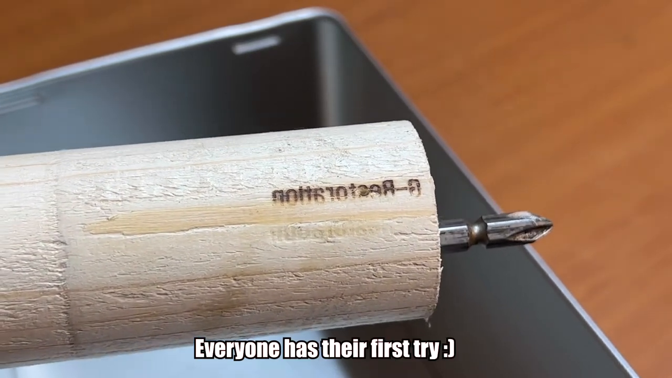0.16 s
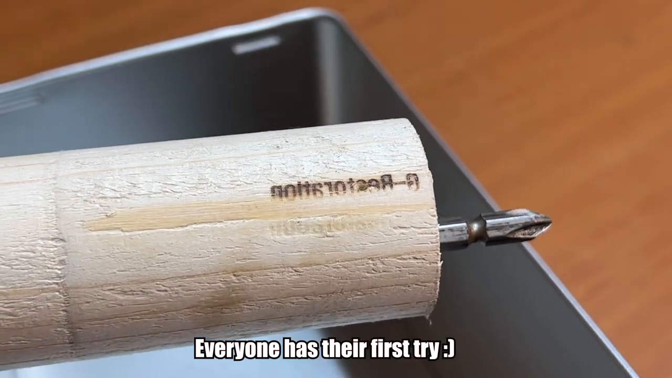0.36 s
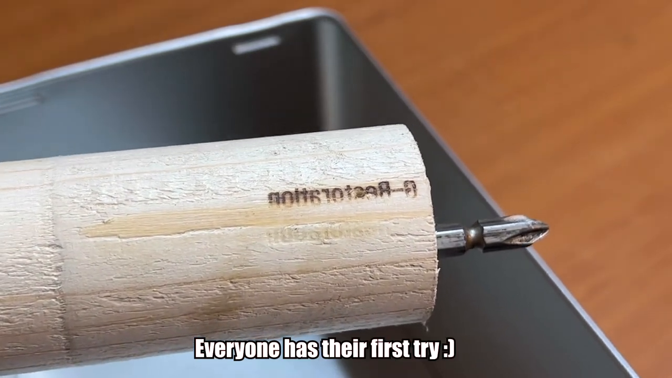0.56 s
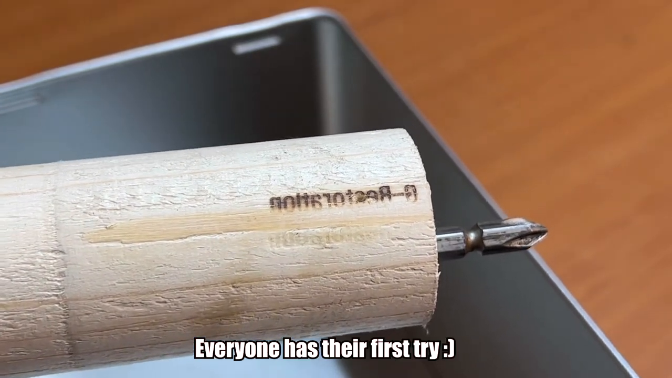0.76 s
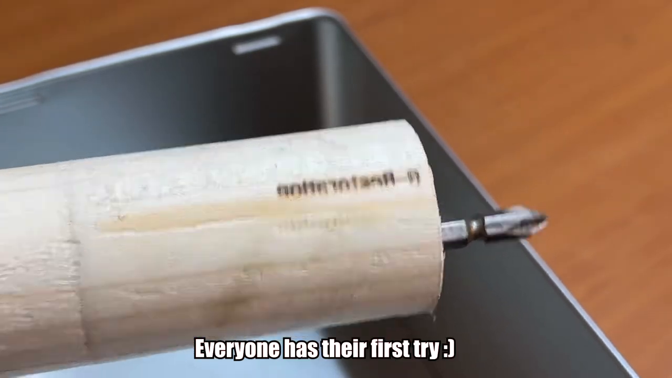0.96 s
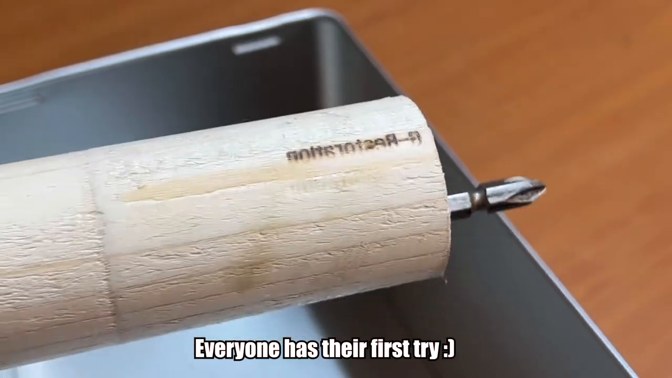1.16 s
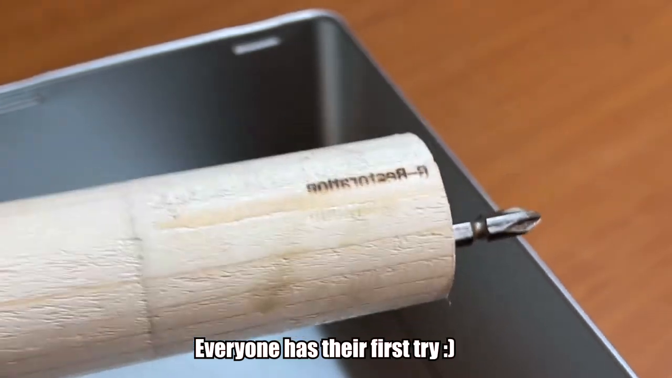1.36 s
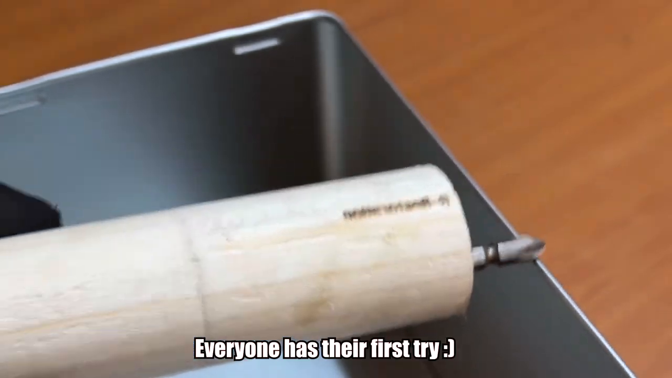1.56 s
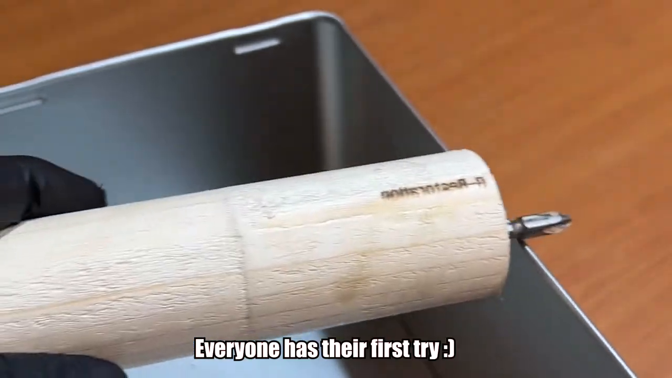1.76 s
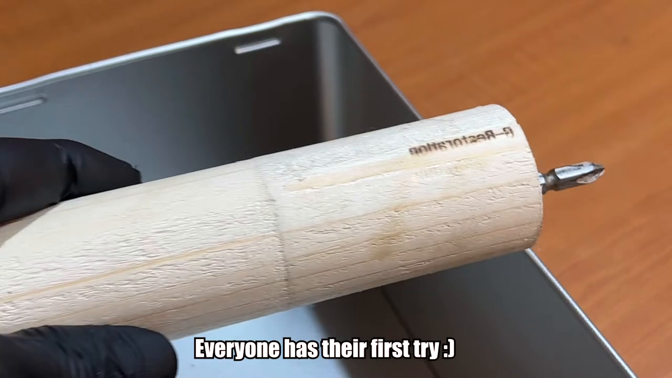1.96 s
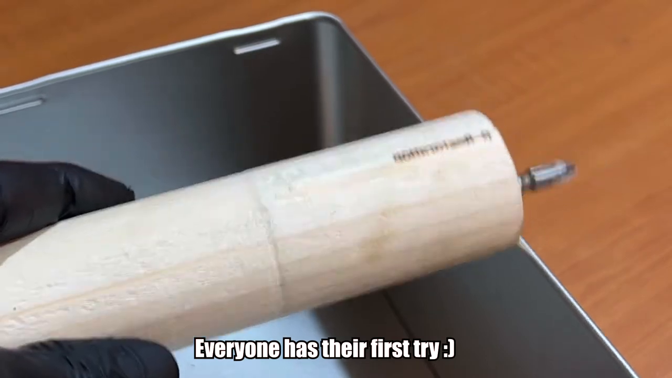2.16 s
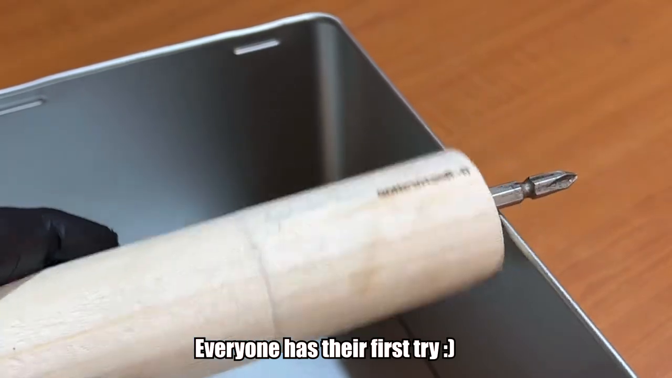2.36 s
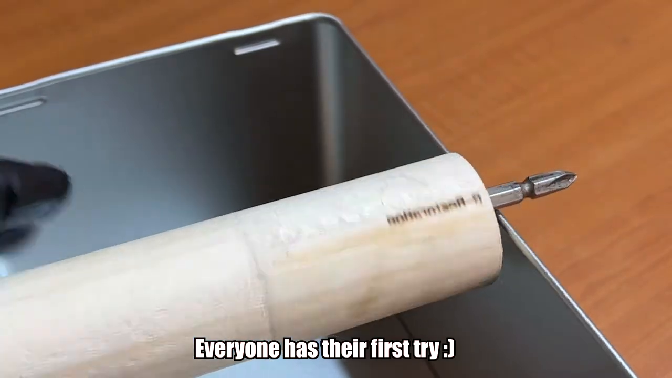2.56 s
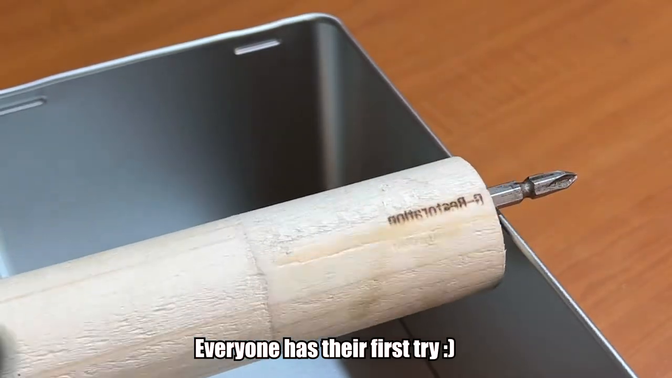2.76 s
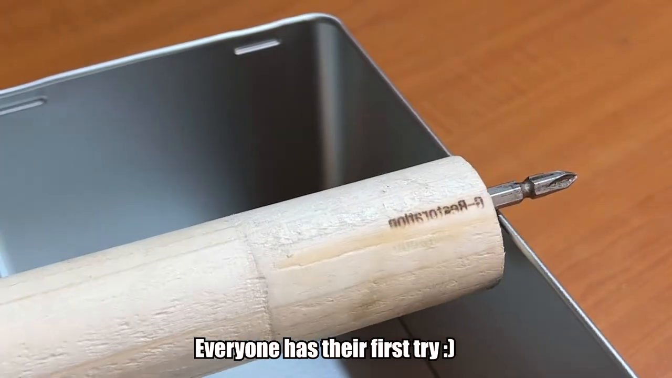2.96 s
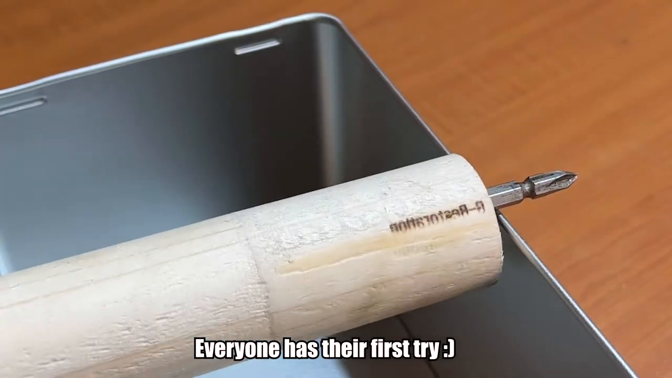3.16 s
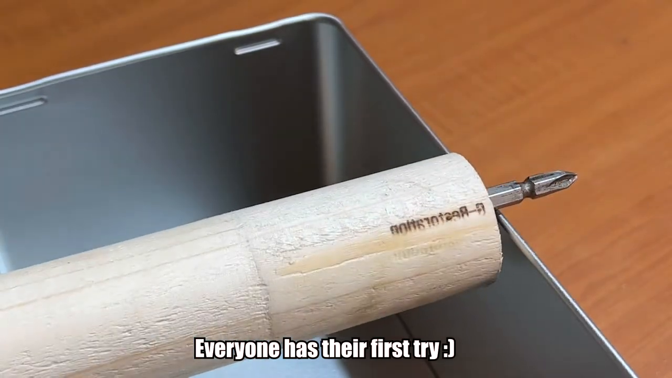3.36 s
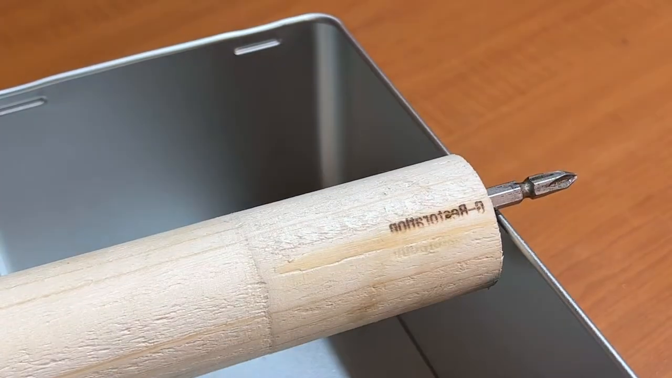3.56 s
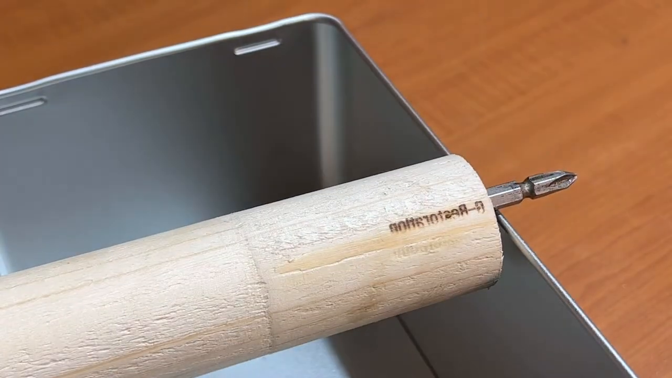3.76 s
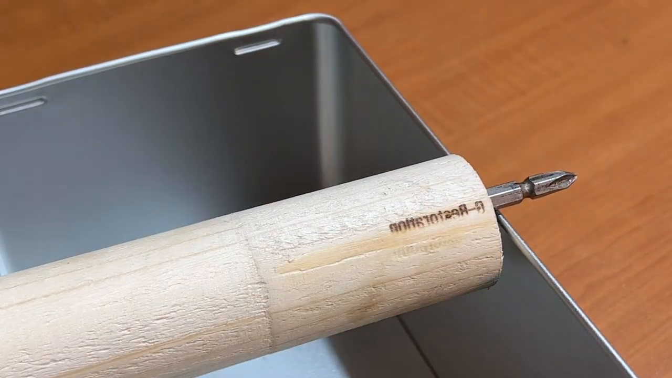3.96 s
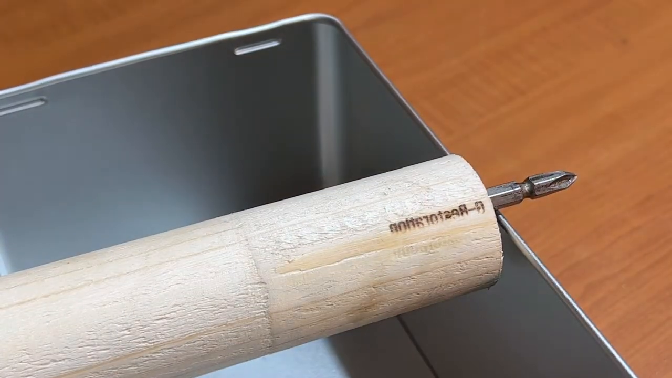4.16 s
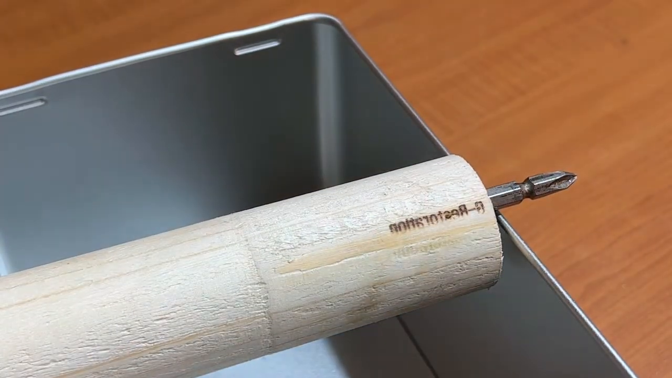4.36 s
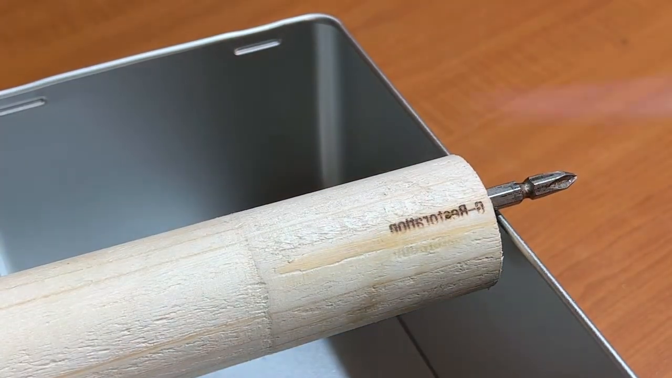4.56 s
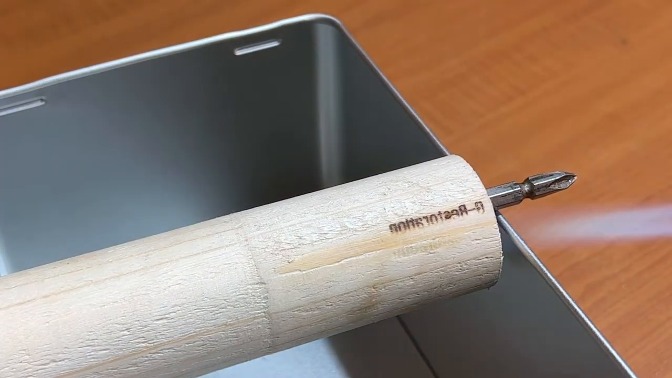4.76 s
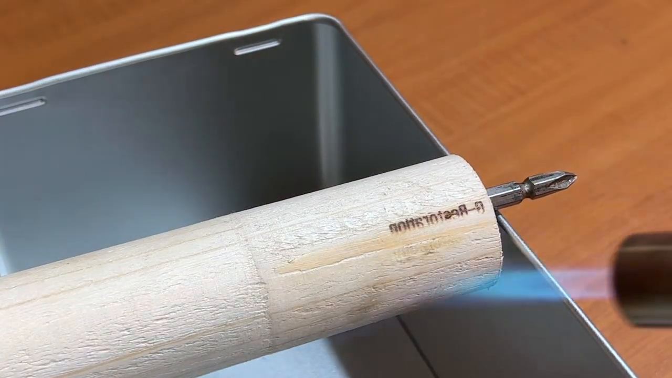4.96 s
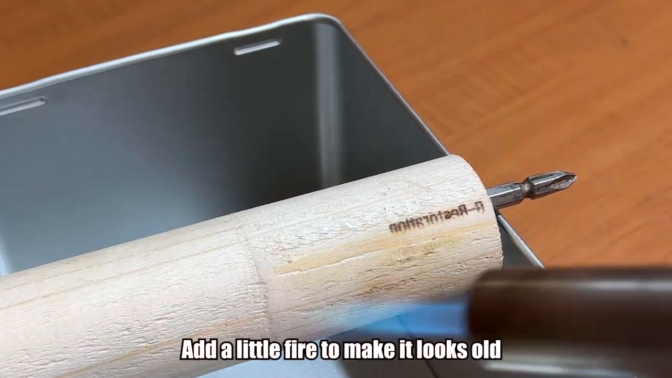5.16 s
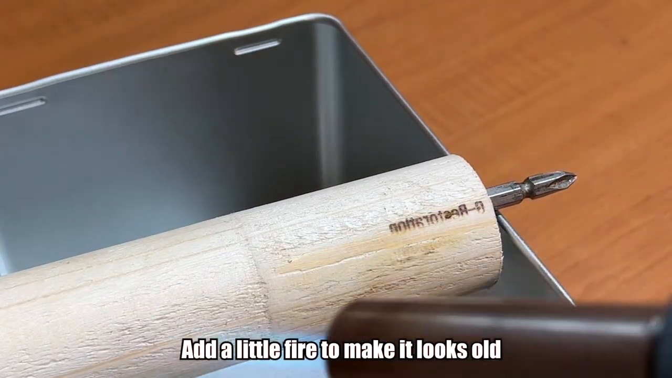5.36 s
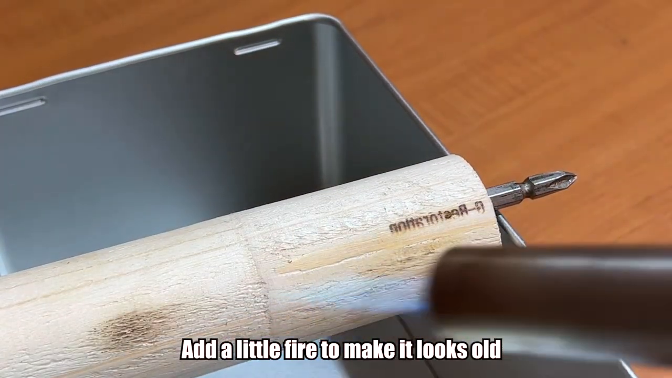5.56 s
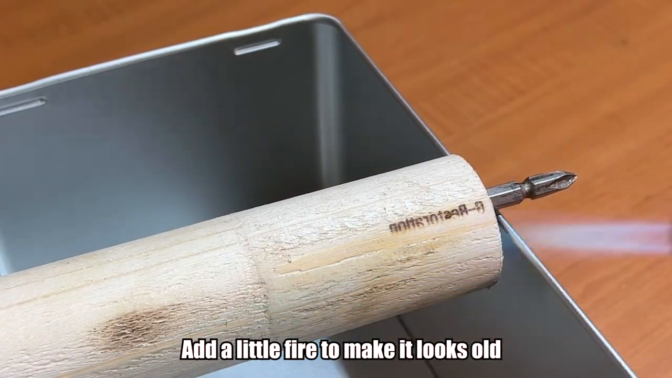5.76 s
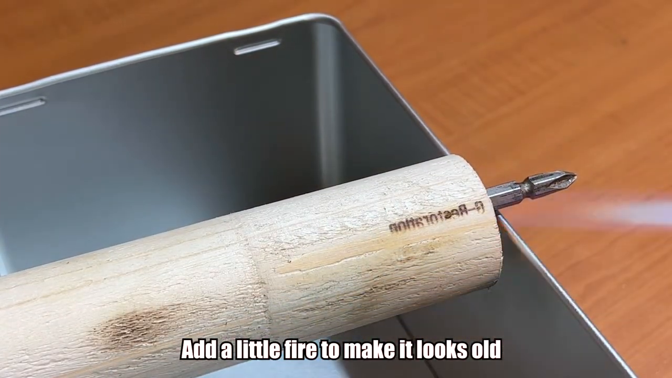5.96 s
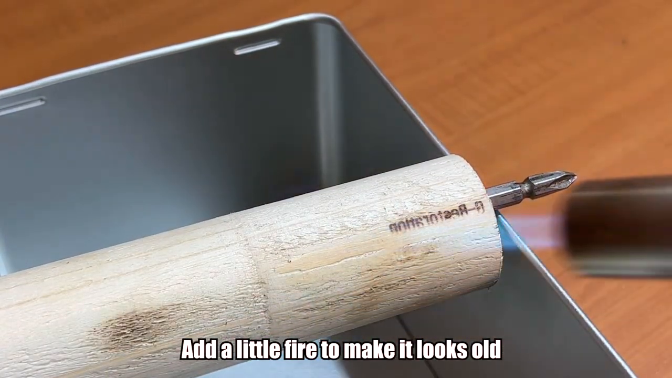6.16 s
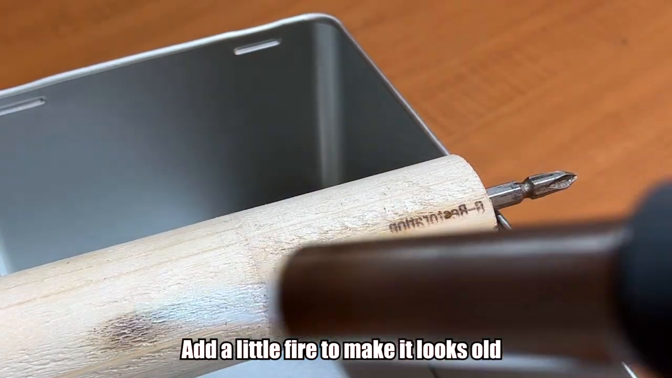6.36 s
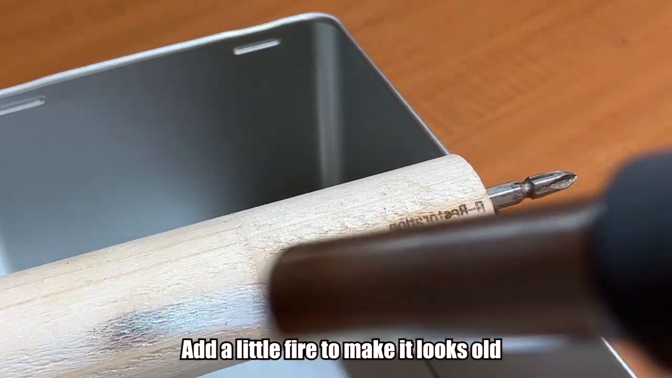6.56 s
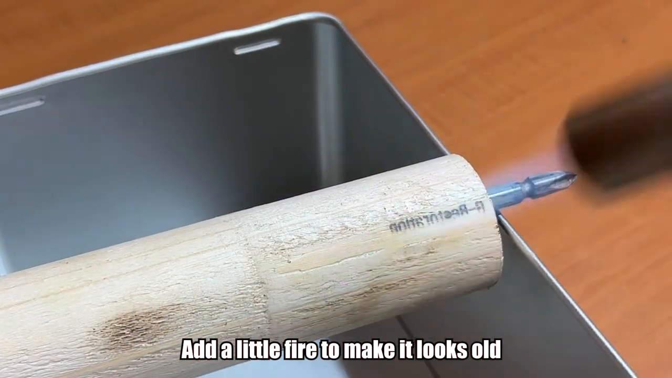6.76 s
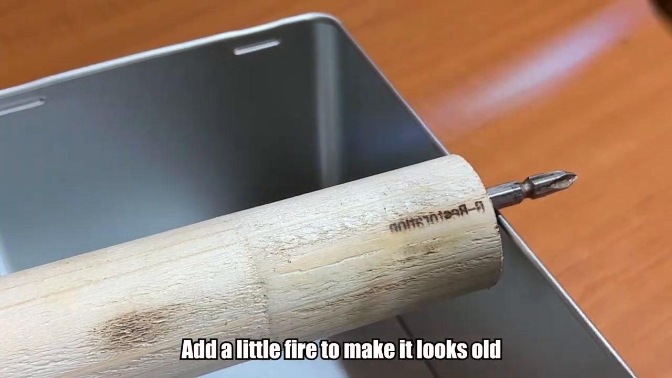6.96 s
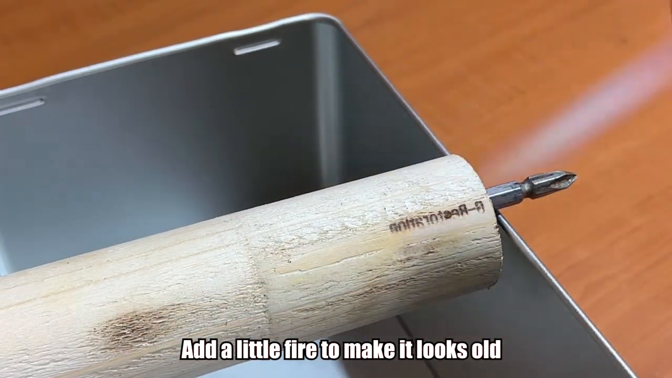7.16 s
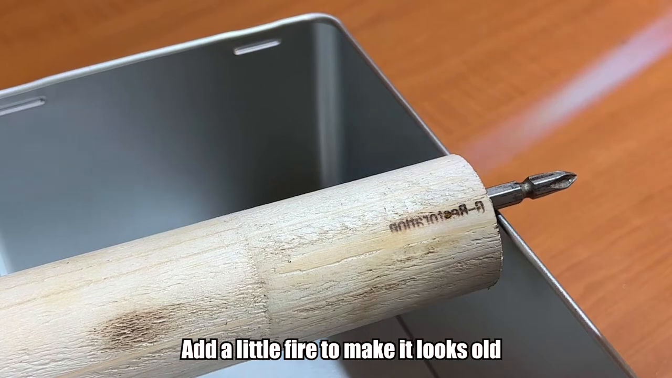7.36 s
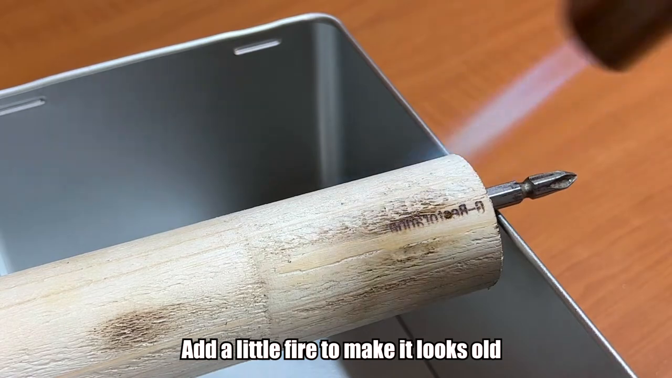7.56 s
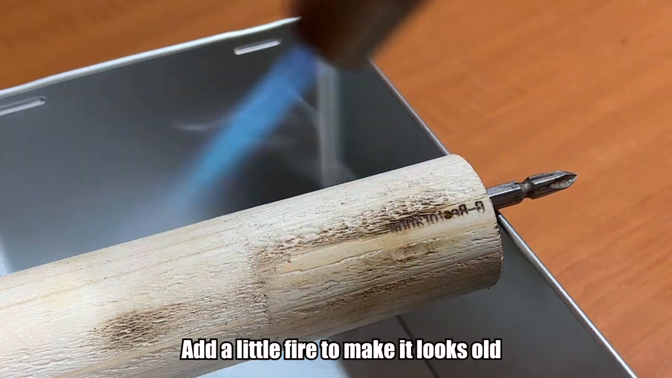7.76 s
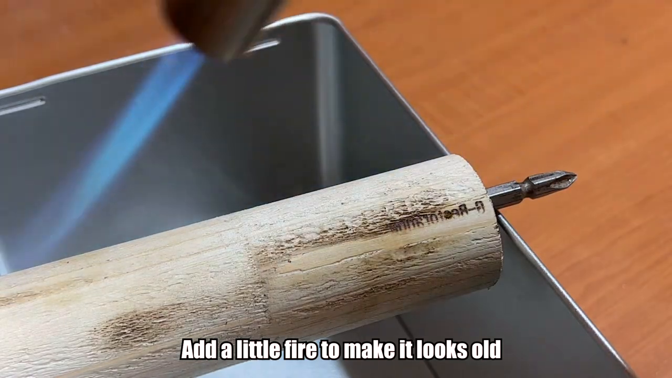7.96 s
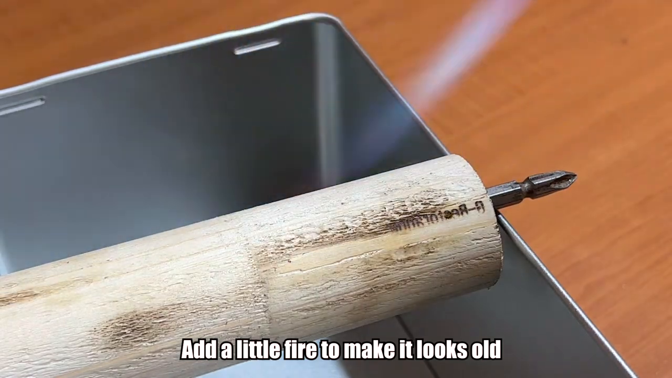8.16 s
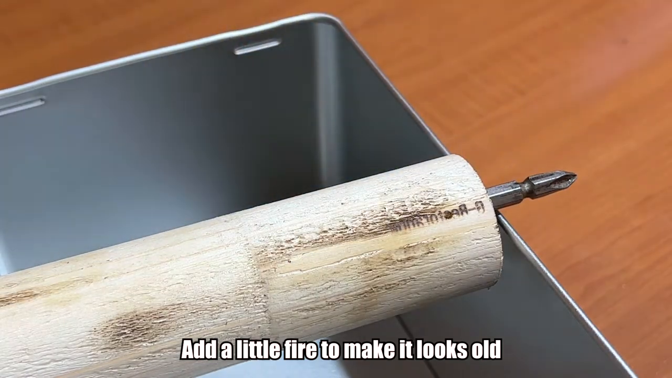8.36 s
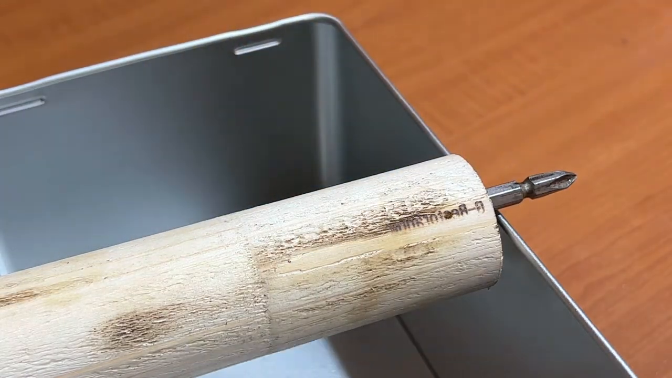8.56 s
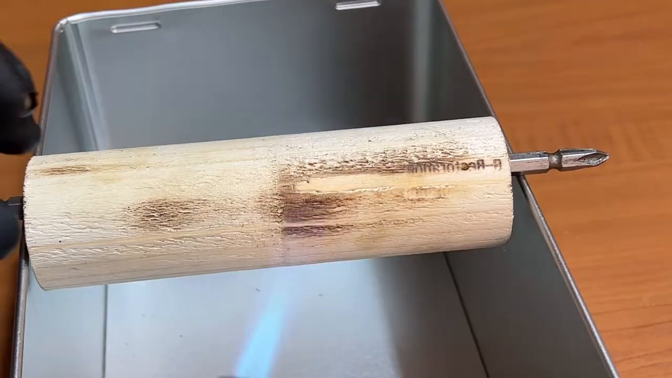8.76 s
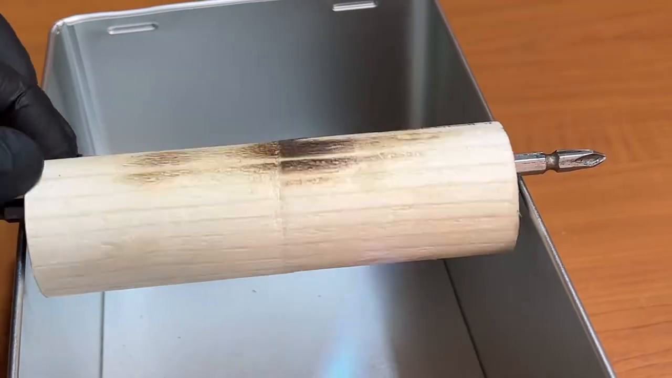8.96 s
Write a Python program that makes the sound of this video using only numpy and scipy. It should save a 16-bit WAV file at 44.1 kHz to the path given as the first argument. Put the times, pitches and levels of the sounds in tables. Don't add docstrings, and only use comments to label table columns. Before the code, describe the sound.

Close stereo pickup in a small workshop with a low, wavering machine hum. Faint rubber glove creaks come before a wooden handle clanks and settles on a thin steel tray, ringing briefly. After an abrupt change, gas hisses, an igniter snaps, and the flame catches with thumps and ragged sputters. It settles into a low, fluttering roar with airy hiss and tiny wood spits, ending in a short higher-pitched burst.

```python
import sys
import numpy as np
from scipy import signal
from scipy.fft import rfft, irfft, next_fast_len
from scipy.io import wavfile
from scipy.ndimage import uniform_filter1d, map_coordinates

SR = 44100
rng = np.random.default_rng(int(sys.argv[2]) if len(sys.argv) > 2 else 0)


def dump_mix(stems):
    frames = np.atleast_2d(stems).T
    limited = np.clip(frames, -1, 1)
    pcm = np.round(limited * 32767).astype(np.int16)
    wavfile.write(sys.argv[1], SR, pcm)


def boost(x):
    u = np.asarray(x, float) / 20
    return 10 ** u


N = 397631
TIME = np.arange(N) / SR
SLOW = np.arange(0, N + 16, 16) / SR
SPEED = 3

# gas on, then hurried view, in seconds.
CUTS = (3.531, 8.667)


def unit(x):
    return x / np.sqrt(np.mean(x ** 2) + 1e-20)


def along(points, hz):
    f, v = np.transpose(points)
    return np.interp(np.log(hz + 1), np.log(f + 1), v)


def curves(rows):
    s, *cols = np.transpose(rows)
    return [np.interp(TIME, s, c) for c in cols]


def wobble(rate_hz):
    knots = rng.standard_normal(int(N * rate_hz / SR) + 4)
    return np.interp(TIME, SLOW, map_coordinates(knots, [SLOW * rate_hz]))


def swells(rows):
    bells = (boost(db) * np.exp(-((SLOW - s) / half_s) ** 2) for s, db, half_s in rows)
    return np.interp(TIME, SLOW, sum(bells))


def filtered(x, response):
    m = next_fast_len(x.shape[-1] + 8192)
    return irfft(rfft(x, m) * response(np.fft.rfftfreq(m, 1 / SR)), m)[..., :x.shape[-1]]


def shot(start_s, end_s):
    return np.clip(np.minimum(TIME - start_s, end_s - TIME) / .002 + .5, 0, 1)


def add_at(out, s, sound):
    out[..., round(s * SR):][..., :sound.shape[-1]] += sound


def rush(spectrum, alike, patchy_db, span, grain=np.ones(N), speed=1):
    out = np.zeros((2, N))
    part = slice(round(max(span[0] - .05, 0) * SR), round((span[1] + .05) * SR))
    length = len(TIME[part])
    z = signal.stft(grain[part] * rng.standard_normal((2, length)), nperseg=512)[2]
    field = uniform_filter1d(rng.standard_normal(z.shape[1:]), size=5, axis=0)
    field = uniform_filter1d(field, size=10, axis=1)
    pair = signal.istft(z * boost(patchy_db * unit(field)), nperseg=512)[1][:, :length]

    def colour_and_width(hz):
        turn = np.arccos(np.clip(along(alike, hz / speed), -1, 1)) / 2
        return boost(along(spectrum, hz / speed)) * [np.cos(turn), np.sin(turn)]

    mid, side = filtered(pair, colour_and_width)
    out[:, part] = unit(np.array([mid + side, mid - side]))
    return out * shot(*span)


def echoed(pair, crest_hz, order, db):
    def late(bounce):
        return np.array([np.interp(TIME - bounce * order / crest_hz, TIME, x) for x in pair])

    return pair + boost(db) * late(0.97) + boost(2 * db) * late(2.2)


# time in seconds, level in dB.
AIR = [(0, -62), (3.52, -58), (8.66, -62.5)]
# frequency in Hz, density in dB per Hz.
AIR_COLOUR = [(13, -67.5), (22, -33.5), (40, -19), (64, -12), (77, -8.5), (86, -12), (113, -24),
              (180, -28.5), (376, -40.5), (926, -42), (2040, -56.5), (3000, -72.5), (15000, -84.5)]
# frequency in Hz, left-right likeness.
AIR_ALIKE = [(60, 1), (240, 0.8), (950, 0.063), (3770, 1), (15000, 0.091)]
# middle in seconds, peak in dB, half length in seconds.
HUM_SWELLS = [(0.0, -35, 0.031), (.45, -48, .2), (.9, -46.5, .15), (1.56, -36.5, 0.19), (1.9, -40, .18),
              (2.35, -40, .14), (2.7, -42, 0.19), (3.19, -40.5, 0.11), (3.48, -38.5, 0.065),
              (3.81, -40.5, .07), (4.11, -35, .05), (4.85, -49, 0.3), (6.57, -41.5, 0.044), (7.0, -46, .2),
              (7.5, -46, 0.29), (8.12, -40, .14), (8.44, -42, 0.082)]
# frequency in Hz, level in dB.
WHINE = [(3418, -108), (4000, -109)]
HUM_HZ, HUM_LATER_HZ, HUM_FLOOR_DB = 62.34, 64.6, -58.5


def workshop():
    pitch_hz = np.where(TIME < CUTS[0], HUM_HZ, HUM_LATER_HZ) + 1.5 * wobble(7.7)
    hum_level = np.sqrt(2) * (boost(HUM_FLOOR_DB) + swells(HUM_SWELLS))
    hum = hum_level * np.sin(2 * np.pi * np.cumsum(pitch_hz) / SR)
    for hz, db in WHINE:
        hum = hum + np.sqrt(2) * boost(db + 3) * np.sin(2 * np.pi * hz * TIME)
    noise = rush(AIR_COLOUR, AIR_ALIKE, patchy_db=1.0, span=(-1, CUTS[1]))
    air = boost(curves(AIR)[0] + 11.0) * noise
    return hum * boost([[.3], [-.3]]) * shot(-1, CUTS[1]) + air


# middle in seconds, peak in dB, half length in seconds.
CREASES = [(1.055, -86, .015), (1.119, -82, .004), (1.135, -89, .015), (1.275, -84, .004),
           (1.358, -86, .008), (1.33, -81, .025), (1.54, -85, 0.047), (1.82, -67, .06), (2.155, -68, 0.037),
           (2.222, -67, .008), (2.38, -61, .06), (2.62, -75, 0.022), (2.9, -86, 0.037), (3.0, -81, .25),
           (3.27, -79, .12)]


def glove():
    colour = [(1500, 2.0), (3000, 6.5), (8000, 1.0), (12500, 1.0), (15000, -17.5)]  # Hz, dB per Hz
    grain = boost(1.6 * wobble(120))
    return swells(CREASES) * rush(colour, [(4000, 0.84)], patchy_db=1.5, span=(.9, CUTS[0]), grain=grain)


# start in seconds, peak in dB, low ring in dB, brightness in dB,
# share of the full decay time.
KNOCKS = [(1.581, -25.5, -9.5, -22, 0.39), (1.588, -18.5, -5.5, -12.5, 0.32),
          (1.596, -22.5, -6.5, -7.5, 0.46), (1.614, -27, -1, -20, 1), (1.659, -27, -7.5, -24, 1),
          (1.849, -43, 1.5, -21, 0.61), (2.033, -40.5, 2, -35.5, 0.86), (2.11, -59, 5.5, -7, 0.33),
          (2.138, -53, -3, -17, 1), (2.15, -53, -3, -17, 1), (2.229, -17, -18, -10, 0.36),
          (2.244, -20, -18.5, -38, 0.87), (2.289, -28, -16, -37, 0.95), (2.408, -44, 2.5, -24.5, 0.5),
          (2.414, -41, 2.5, -24.5, 1.15), (2.607, -52, 6.5, -21, 0.83)]
# frequency in Hz, level in dB, t60 in seconds.
TRAY = [(150, -1, .3), (180, -7, 1.3), (258, -5, .6), (303, -4, .45), (387.5, -3, .7), (440, -3, .8),
        (555.2, -6, .9), (684, -5, 1.1), (906, -6, .4), (1197, -14, .9), (1440, -8, 0.39), (1837, -8, 0.29),
        (2772, -8, .4), (2914, -4, 0.2)]
SEAT = [(386, 4, 0.19), (423, 5, .35), (520, 0.5, .3), (690, 1.5, .3), (895, -7, .25)]
CHINK = [(1450, -12, .2), (2455, -4, .18), (2665, -5, 0.12), (3537, -8, 0.15), (4608, -11, .15)]
RIM = [(240, -1, .25), (305, -2, 0.25), (425, 2, 0.2), (560, -6, .3), (738, -8, .2), (851, -5, 0.2),
       (1190, -9, 0.45), (1268, -9, 0.4), (1394, -7, 0.19), (1570, -11, 0.34), (1700, -9, .2),
       (1798, -7, 0.3), (2067, -7, .22), (2320, -6, 0.2)]
ROCK = [(180, -2.5, .9), (251, 3.5, 0.44), (309, 0, 0.68), (490, 6, .2), (551, 4.5, .16), (692, -2, 0.5),
        (2340, -16, .4)]
REST = [(303.5, 4.5, 0.59), (417, -1, .26), (510, 6.5, 0.57), (4447, -10, .15)]
# start in seconds, mode table from then on.
SPOTS = [
    (0, TRAY),
    (2, SEAT),
    (2.09, CHINK),
    (2.2, RIM),
    (2.35, ROCK),
    (2.55, REST),
]
# frequency in Hz, level in dB, t60 in seconds.
SHEET = [(151, 5, 1.2), (400, 9, 0.81), (1180, -4, 0.7), (2980, -7.5, 0.74), (6900, -10.5, 0.51),
         (10800, -7, 0.33), (14700, -22, 0.17)]
TRAY_PAN_DB = .5


def tray():
    out, t = np.zeros((2, N + SR)), np.arange(SR * 3 // 5) / SR
    f, level_db, t60_s = np.transpose(SHEET)
    for s, db, low_db, bright_db, share in KNOCKS:
        tilt = lambda hz: along([(300, low_db), (1200, 0.0033), (7000, bright_db + 12.5)], hz)
        modes = [spot for start, spot in SPOTS if start < s][-1]
        ring = 0
        for hz, mode_db, mode_s in modes:
            decay_s = share * min(mode_s, 1.14 * along(np.c_[f, t60_s], hz))
            level = boost(mode_db + tilt(hz) + rng.normal(0, 1.2) - 60 * t / decay_s)
            tone = np.sin(2 * np.pi * hz * t + rng.uniform(0, 5.5))
            throb = 1 + 0.5 * np.sin(rng.uniform(40, 130) * t)
            ring = ring + level * tone * throb

        hz, frames, z = signal.stft(rng.standard_normal((2, len(t))), SR, nperseg=256)
        fall_db = 60 * frames / (share * along(np.c_[f, t60_s], hz))[:, None]
        start_db = (along(np.c_[f, level_db], hz) + tilt(hz))[:, None]
        wash = signal.istft(z * boost(start_db - fall_db), SR, nperseg=256)[1][:, :len(t)]
        crack = 1 + 1.65 * boost(-60 * t / 0.036)
        side = .55 * filtered(wash[1], lambda hz: 1 / (1 + (hz / 1800) ** 4))
        wash = wash[0] * crack + side * [[1], [-1]]

        onset = 1 - np.exp(-t / 0.00038)
        pan = boost([[TRAY_PAN_DB], [-TRAY_PAN_DB]])
        add_at(out, s, boost(db - 9.5) * onset * (ring + boost(6.5) * wash) * pan)
    return out[:, :N] * shot(-1, CUTS[0])


# start in seconds, peak in dB, length in seconds, low part in
# dB.
SNAPS = [
    (3.53, -42, 0.0072, -4),
    (3.701, -33, 0.009, -1),
    (3.77, -12.5, 0.0063, -23),
    (3.751, -44, .008, -14),
    (3.964, -21, 0.007, -12),
]
# frequency in Hz, density in dB per Hz.
PIEZO = [(500, -8), (930, -18), (1900, -9), (3100, -6), (5300, -16), (6300, -8), (8000, -9), (10000, -11),
         (12000, -13), (15800, -16)]


def igniter():
    out, t = np.zeros((2, N)), np.arange(SR // 4) / SR
    for s, db, length_s, low_db in SNAPS:
        fade = boost(-20 * (t / length_s) ** 2) + 0.15 * boost(-60 * t / 0.4)
        swell = (1 - np.exp(-t / 0.001)) * fade
        tilt = [(1500, low_db + 14.0), (5000, 0.01)]
        rattle = filtered(rng.standard_normal(len(t)), lambda hz: boost(along(PIEZO, hz) + along(tilt, hz)))
        add_at(out, s, boost(db - 8.5) * swell * unit(rattle))
    return out


# time in seconds, level in dB.
JET = [(3.53, -60.5), (3.62, -62), (3.76, -57.5), (4.2, -58), (4.33, -59), (4.6, -56), (5.1, -56.5),
       (5.46, -54.3), (5.78, -55.5), (6.24, -57), (6.5, -53.5), (6.69, -55), (7.01, -57), (7.18, -55.5),
       (8.14, -56.5), (8.66, -60)]
# frequency in Hz, density in dB per Hz.
NOZZLE = [(1500, -6.5), (2900, -22), (3400, -8.5), (3800, 0.5), (4200, -4.5), (4500, -1), (5100, -2.5),
          (5600, -11), (7400, -9.5), (7800, -2.5), (9000, 0), (10000, -6), (11700, -11.5), (12300, -9.5),
          (13100, -21.5), (15300, -13)]
# time in seconds, low comb crest in Hz, high comb crest in Hz.
SWEEP = [(3.5, 4600, 8750), (4.55, 4700, 8000), (4.85, 4680, 8750), (5.15, 4620, 8850), (5.42, 4480, 8550),
         (5.7, 4750, 8900), (5.95, 5050, 8750), (6.2, 4720, 8800), (6.5, 4800, 8600), (6.75, 5100, 8900),
         (7.05, 4980, 8650), (7.5, 5000, 8750), (7.85, 4550, 8250), (8.05, 4700, 8700), (8.3, 4900, 8300),
         (8.66, 4750, 8750)]
BEAM_GROWS = .25


def jet():
    low_crest_hz, high_crest_hz = curves(SWEEP)
    jet_db, = curves(JET)
    hiss = rush(NOZZLE, [(3000, 0.97)], patchy_db=1.4, span=CUTS)
    tube = filtered(hiss, lambda hz: 1 / (1 + (hz / 4200) ** 24))
    high = filtered(hiss, lambda hz: 1 - 1 / (1 + (hz / 5900) ** 12))
    floor = echoed(hiss - tube - high, low_crest_hz, order=5, db=-8 + 1.5 * wobble(2.5))
    wall = echoed(high, high_crest_hz, order=10, db=-7 + 2 * wobble(2.5))
    beam = boost(BEAM_GROWS * (jet_db + 56))
    return boost(jet_db + 5 + 0.83 * wobble(7)) * (tube + floor + beam * wall) * shot(*CUTS)


# time in seconds, left minus right in dB.
LEAN = [(3.78, -8), (3.9, -5.5), (4.2, -4.5), (4.45, -2), (4.6, 0)]
LAG_S_PER_DB, LEAN_TOP_HZ = 9e-5, 1200


def leaning(pair):
    lean_db, = curves(LEAN)
    low = filtered(pair, lambda hz: 1 / (1 + (hz / LEAN_TOP_HZ) ** 6))
    left = np.interp(TIME + LAG_S_PER_DB * lean_db, TIME, low[0])
    return pair - low + np.array([left, low[1]]) * boost(lean_db / 2 * [[1], [-1]])


# start in seconds, hold in seconds, tearing in dB, time to fall 20 dB in seconds.
SPUTTERS = [(3.771, .002, -36, .06), (3.785, .004, -44, .05), (3.801, .008, -42, .3), (3.95, .01, -46, .05),
            (3.962, .008, -34, .03), (3.976, .04, -36, .05), (4.065, .012, -33, .03),
            (4.088, .018, -33, .025), (4.111, .01, -35, .03), (4.121, .016, -30, .02),
            (4.141, .01, -33, .02), (4.165, .008, -43, .3), (4.342, .05, -36, .05), (4.4, .018, -37, .04),
            (4.424, .008, -40, .04), (4.432, .01, -36, .03), (4.452, .03, -38, .06), (4.502, .01, -43, .06),
            (4.535, .005, -46, .1), (4.63, .13, -52, .2), (6.22, .05, -52, 0.04), (6.867, 0.024, -53, 0.08),
            (7.01, .01, -39, .03), (7.02, .014, -39, 0.03), (7.06, 0.0089, -48, 0.14),
            (7.228, 0.016, -49.5, .15), (7.395, 0.017, -52.5, 0.25), (8.235, 0.034, -51.5, 0.02)]
SPUTTER_RISE_S = .006


def sputters():
    total = 0
    for s, hold_s, db, fall_s in SPUTTERS:
        fall_db = 20 * np.clip(SLOW - s - hold_s, 0, 1) / fall_s
        rise = np.clip((SLOW - s) / SPUTTER_RISE_S, 0, 1)
        total = total + boost(db - fall_db) * rise
    return np.interp(TIME, SLOW, total)


# time in seconds, roar in dB.
FLAME = [(3.78, -47), (4.3, -44), (4.9, -42.5), (5.3, -39), (5.45, -41.5), (5.84, -39.5), (6.1, -42.5),
         (6.32, -40.5), (7.0, -42), (7.4, -42.5), (7.48, -43.5), (7.85, -41.5), (8.0, -44), (8.28, -40),
         (8.66, -47.5)]
# frequency in Hz, density in dB per Hz.
ROAR = [(41, -72), (70, -21), (107, -2.5), (135, -6), (225, -1), (339, -2), (382, -4.5), (620, -28),
        (810, -53), (1360, -120)]
# frequency in Hz, density in dB per Hz.
TEAR = [(240, -47), (450, -3), (650, -2), (900, -1), (1100, -10.5), (1450, -8.5), (1800, -12), (2300, -12),
        (3500, -17), (5500, -23.5), (7200, -21), (8300, -19), (9800, -20.5), (12000, -27.5), (15800, -32.5)]
# frequency in Hz, density in dB per Hz.
SIMMER = [(320, -21), (550, -9), (650, -8), (868, -3), (1290, -8), (1610, -18), (2300, -17), (3200, -24),
          (4160, -31), (7040, -120)]
# frequency in Hz, left-right likeness.
FLAME_ALIKE = [(60, 1), (290, 0.99), (640, 0.9), (1400, 1), (3100, 1)]
# start in seconds, peak in dB, pitch in Hz, broad # part in
# dB.
GULPS = [
    (3.78, -16, 82.7, -24),
    (3.807, -19, 99, -21),
    (3.999, -17, 208, -17),
    (4.101, -17, 114.7, -7),
    (4.451, -21, 268.5, -18),
    (7.025, -30, 292, -12),
    (7.239, -28, 85.9, -25),
    (7.259, -32, 218, -15),
    (7.406, -22, 83.4, -26),
         (3.782, -17, 260, -25),
    (3.806, -15, 476, -22),
    (3.814, -18, 190, -28),
    (3.834, -21, 300, -28),
    (3.998, -18, 520, -20),
]
LIT_S = 3.775
TEAR_UNDER_DB, TEAR_DRIFT_DB = 12, 1.1
ROAR_FOLLOWS = 0.26


def flame():
    strength_db, = curves(FLAME)
    settled_db = strength_db - TEAR_UNDER_DB + TEAR_DRIFT_DB * wobble(9)
    tear_db = 10 * np.log10(boost(2 * settled_db) + sputters() ** 2)
    roar_db = strength_db + ROAR_FOLLOWS * (tear_db - strength_db + TEAR_UNDER_DB)
    flicker, span = wobble(35), (LIT_S, CUTS[1])

    grain = boost(0.9 * flicker)
    roar = boost(roar_db + 2.5) * rush(ROAR, FLAME_ALIKE, patchy_db=1.0, span=span, grain=grain)
    grain = boost(0.63 * flicker + 1.8 * wobble(160))
    tear = boost(tear_db - 0.5) * rush(TEAR, FLAME_ALIKE, patchy_db=2.0, span=span, grain=grain)
    grain = boost(0.51 * flicker + 1.75 * wobble(140))
    simmer = boost(tear_db - 0.05) * rush(SIMMER, FLAME_ALIKE, patchy_db=1.0, span=span, grain=grain)
    calm = np.clip((-44 - tear_db) / 4, 0, 1)
    out = roar + np.sqrt(calm) * simmer + np.sqrt(1 - calm) * tear

    t = np.arange(SR // 25) / SR
    for s, db, hz, broad_db in GULPS:
        push = np.sin(2 * np.pi * hz * t) * np.exp(-(t * hz / 0.87) ** 2)
        spit = signal.lfilter([.4], [1, -.6], rng.standard_normal(len(t)))
        spit = spit * (t / .002) * np.exp(1 - t / 0.0012)
        add_at(out, s, boost(db - 6.5) * (push + boost(broad_db + 5) * spit))
    return out


def ringing(hz, width_hz, rows):
    b, a = signal.butter(2, width_hz / SR)
    slow = signal.lfilter(b, a, rng.standard_normal((2, N)))
    turn = 2 * np.pi * np.cumsum(hz * np.ones(N)) / SR
    tone = unit(slow[0] * np.cos(turn) + slow[1] * np.sin(turn))
    return swells(rows) * tone * shot(*CUTS)


# middle in seconds, peak in dB, half length in seconds.
BOX = (70, [(4.7, -57, .15), (5.1, -59, .25), (5.6, -56, .3), (6.1, -60, .15), (6.7, -62, .3),
       (7.15, -60, .1)])
# middle in seconds, peak in dB, half length in seconds.
TUBE_LOW = (150, [(4.9, -62, .25), (5.4, -57.5, .3), (6.4, -62.5, .4), (7.2, -63, .3), (7.9, -59, .22),
            (8.4, -65, .2)])
# middle in seconds, peak in dB, half length in seconds.
TUBE_HIGH = (300, [(5.45, -56, .17), (6.52, -55, .13), (7.4, -64, .3), (4.85, -64, .2)])
BOX_HZ = 872


def ringing_air():
    low_crest_hz, high_crest_hz = curves(SWEEP)
    tube = ringing(low_crest_hz, *TUBE_LOW) + ringing(high_crest_hz, *TUBE_HIGH)
    return ringing(BOX_HZ, *BOX) + tube


# start in seconds, peak in dB.
SPITS = [(4.7431, -41), (4.7621, -38), (4.794, -41), (4.8768, -45), (5.2285, -44), (5.6815, -42),
         (5.8955, -44), (5.91, -43), (6.2776, -39), (6.2946, -42), (6.33, -43), (6.4592, -46),
         (7.2379, -41), (7.2569, -43), (7.2804, -43), (7.4031, -41), (7.5622, -45), (8.2412, -40)]
SPIT_DB, SPIT_S = -14, .0025


def spits():
    out, t = np.zeros(N), np.arange(SR // 40) / SR
    for s, db in SPITS:
        puff = signal.lfilter([1, -1], [1, -1.68, .74], rng.standard_normal(len(t)))
        add_at(out, s, boost(db + SPIT_DB) * unit(puff) * (t / SPIT_S) * np.exp(1 - t / SPIT_S))
    return out


# frequency in Hz, density in dB per Hz.
FAST_ROAR = [(35, -72), (60, -45), (117, -26), (145, -10), (168, -2.5), (207, -8), (321, -1), (388, -9),
             (743, -1), (1150, -6), (1830, -24.5), (2670, -19.5), (2960, -31), (5000, -36), (9000, -44),
             (11700, -71), (19800, -120)]
# middle in seconds, peak of the added gain in dB, half length in seconds.
FAST_SURGE = (8.94, -6, .03)
FAST_ROAR_DB, FAST_HISS_DB = -40.6, -54.5


def hurried():
    span = (CUTS[1], 9.016)
    alike = [(500, .99), (1900, 0.95), (2900, 0.62), (3500, 0.99)]  # Hz, left-right likeness
    roar = rush(FAST_ROAR, alike, patchy_db=0.6, span=span, grain=boost(0.57 * wobble(90)))
    hiss = rush(NOZZLE, [(3000, .98)], patchy_db=.8, span=span, speed=SPEED)
    hiss = echoed(hiss, 14000, order=5, db=-5)
    roar_level = boost(FAST_ROAR_DB + 0.62 * wobble(17))
    return (1 + swells([FAST_SURGE])) * (roar_level * roar + boost(FAST_HISS_DB) * hiss)


def scene():
    torch = jet() + igniter() + flame() + ringing_air() + spits()
    return workshop() + glove() + tray() + leaning(torch) + hurried()


# frequency in Hz, lead of the right port in radians.
PORTS = [(450, -.2), (1000, 0), (2200, 0), (3600, -.7), (5100, -.45), (5900, .5), (7300, 0), (7800, .75),
         (8600, 1.3), (9500, 2.95), (10000, 3.14), (10500, 3.35), (12300, 5.4), (12700, 6.28), (13900, 6.6),
         (15800, 9.2)]


def ports(pair, speed=1):
    lead = lambda hz: np.interp(hz / speed, *np.transpose(PORTS))
    return filtered(pair, lambda hz: np.exp(.5j * lead(hz) * np.array([[-1], [1]])))


def roll_off(x):
    return signal.sosfilt(signal.butter(12, 16670, fs=SR, output="sos"), x)


def record(dry):
    early = shot(-1, CUTS[1])
    heard = ports(dry * early) + ports(dry * (1 - early), speed=SPEED)
    heard = filtered(heard, lambda hz: 1 / (1 + (hz / 15850) ** 120) / (1 + (38 / (hz + 1)) ** 4))
    return roll_off(heard)


dry = scene()
out = record(dry)
dump_mix(out)
```